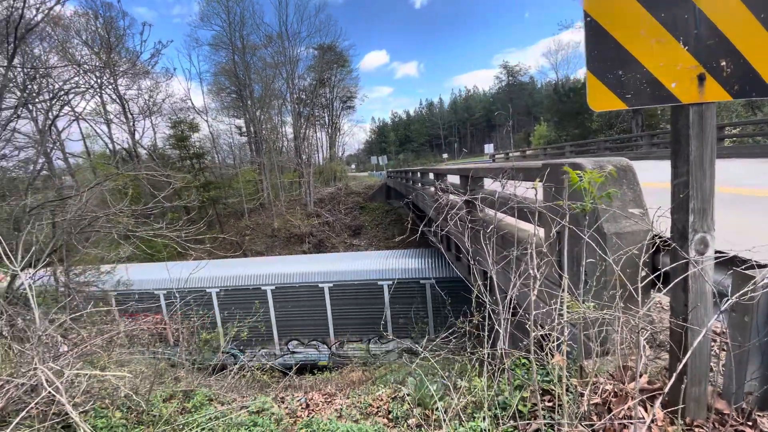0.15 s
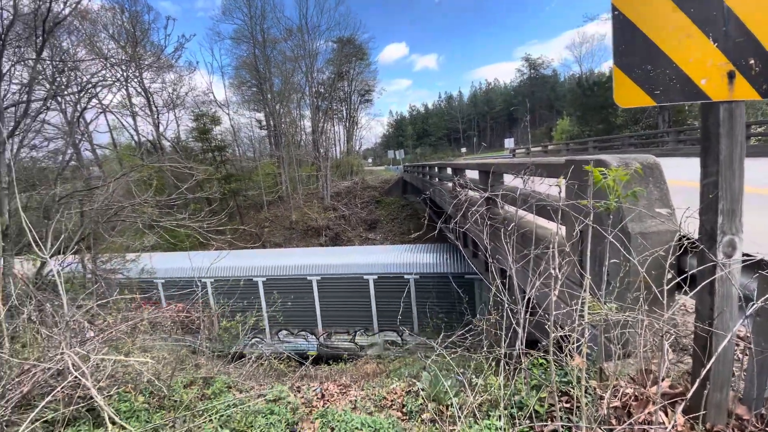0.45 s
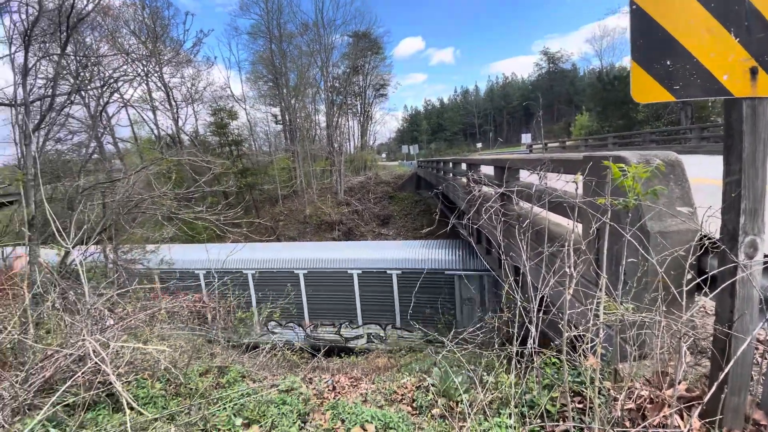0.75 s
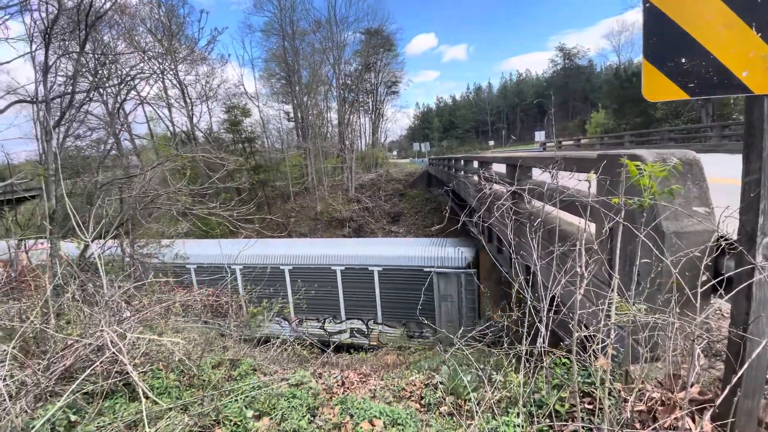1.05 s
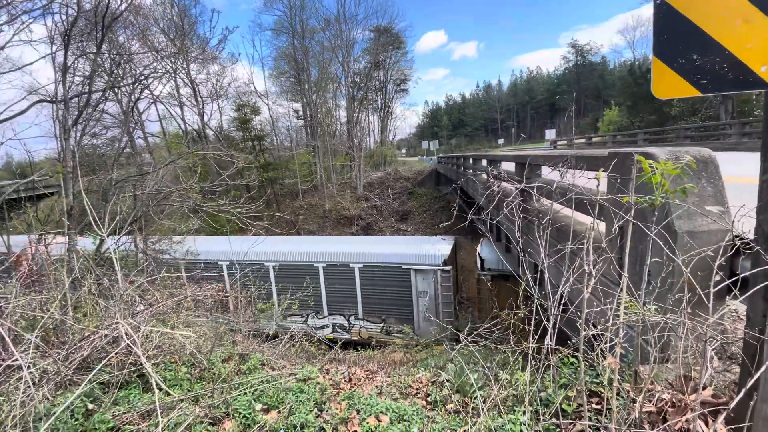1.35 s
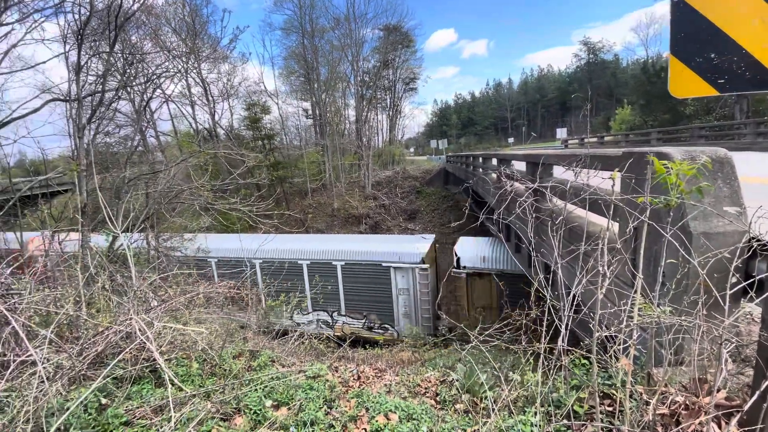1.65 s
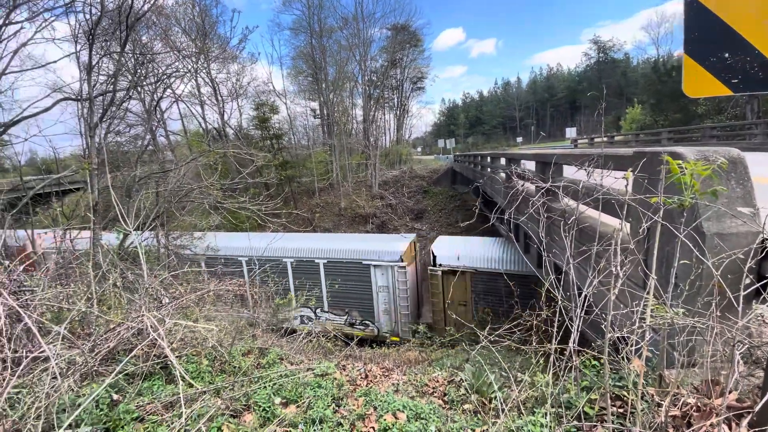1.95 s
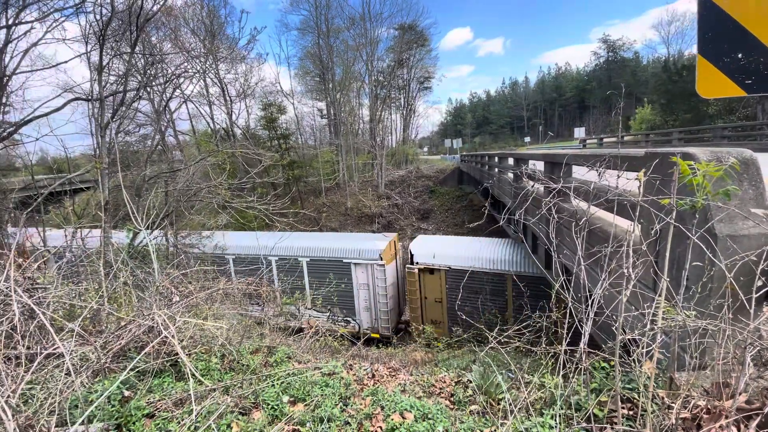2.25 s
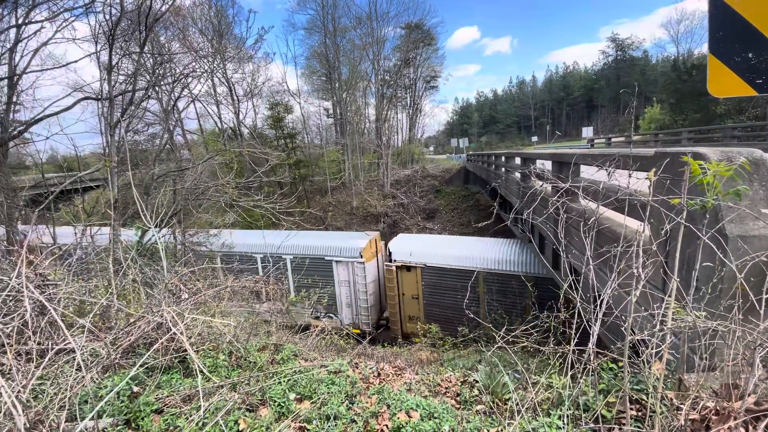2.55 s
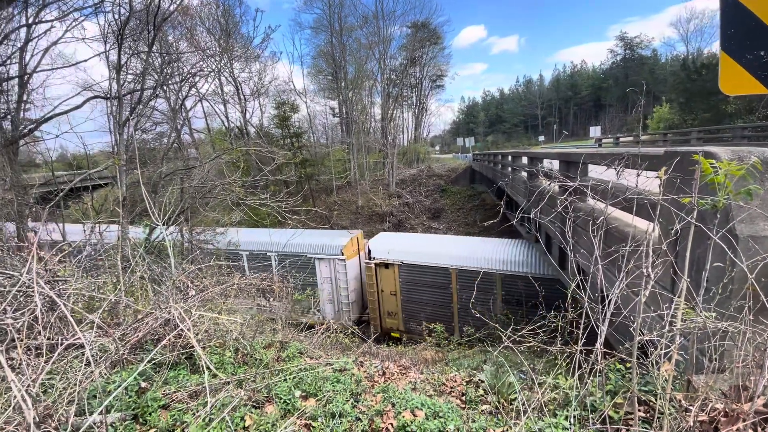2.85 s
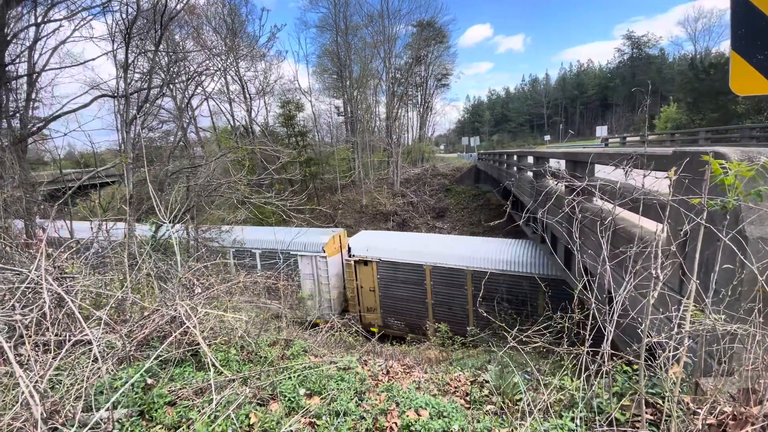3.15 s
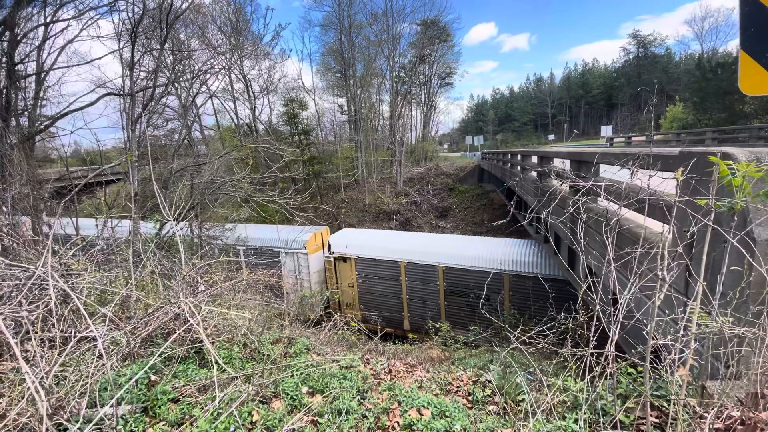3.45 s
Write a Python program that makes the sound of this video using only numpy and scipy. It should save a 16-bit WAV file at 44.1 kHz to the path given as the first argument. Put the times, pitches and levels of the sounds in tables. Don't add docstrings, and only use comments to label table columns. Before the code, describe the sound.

Long freight cars rumble steadily past outdoors, with dull joint knocks, a first metallic scrape, a sharper ringing squeal, then a third grind with loose sheet metal rattling; handheld stereo microphone on the bank above.

```python
import sys
import numpy as np
from scipy import signal
from scipy.fft import rfft, irfft, next_fast_len
from scipy.io import wavfile
from scipy.ndimage import uniform_filter1d, map_coordinates

SR = 44100
rng = np.random.default_rng(int(sys.argv[2]) if len(sys.argv) > 2 else 0)


def store_wav(level_fs):
    pcm = np.round(np.clip(np.atleast_2d(level_fs), -1, 1) * 32767)
    wavfile.write(sys.argv[1], SR, pcm.T.astype(np.int16))


def volts(x):
    e = np.asarray(x, float) / 20
    return 10 ** e


N = 158760

# middle_s, pitch_hz, peak_db
BODY_SWELLS = [(0.029, 102.4, -27), (0.129, 82, -29.5), (.93, 76, -24), (1.32, 98, -31),
               (3.4, 105.4, -30.5), (0.269, 94, -28.5), (0.359, 76.7, -23.5), (0.381, 107.7, -26),
               (.4, 165, -32.5), (.45, 67.7, -22), (.52, 83.3, -34), (.57, 102.6, -27.5),
               (.58, 83.3, -28.5), (.66, 55, -25), (.72, 97, -22.5), (0.739, 53.7, -36),
               (.75, 147.6, -35.5), (0.808, 78, -30), (.85, 108, -26), (0.921, 205.4, -34),
               (1.01, 95.2, -19.5), (1.039, 55.6, -25.5), (1.14, 55.6, -21), (1.211, 92.6, -22),
               (1.23, 179, -31), (1.281, 57, -27), (1.411, 71.6, -42), (1.429, 87.5, -27),
               (1.561, 76.7, -22.5), (1.681, 90, -24.5), (1.729, 175, -32.5), (1.788, 52.4, -25),
               (1.821, 93.4, -20.5), (1.9, 159, -32), (1.931, 96, -21.5), (1.99, 135, -29.5),
               (2.049, 65.8, -19.5), (2.199, 75, -20), (2.23, 165, -30), (2.228, 49.3, -27),
               (2.298, 85, -26.5), (2.369, 165, -30.5), (2.38, 92.3, -24.5), (2.47, 156, -37),
               (2.568, 87.2, -23), (2.641, 73, -28), (2.76, 85, -31), (2.981, 75, -21.5), (3.122, 89, -29),
               (3.221, 71.6, -25.5), (3.289, 90.4, -25.5), (3.371, 55, -27.5), (3.45, 297.4, -40),
               (3.471, 78, -29.5), (3.55, 83.4, -30.5)]
# freq_hz, density_db
TRACK_SPECTRUM = [(20, -58), (33, -23), (44, -1.5), (105, -0.5), (135, -9), (170, -10), (250, -15.5),
                  (1000, -41.5)]
# time_s, level_db
TRACK_LOAD = [(0, -27.5), (.5, -26), (1.2, -26.5), (1.4, -26), (2, -26.5), (2.6, -25.5), (3.1, -28),
              (3.6, -27.5)]
# freq_hz, density_db
TREAD_SPECTRUM = [(350, -4), (600, -1.5), (1000, 5.5), (1600, -6.5), (4000, -3), (6000, -9), (9000, -58)]
# time_s, level_db
HISS_LEVEL = [(0, -44.5), (.66, -42), (.76, -70), (1.11, -70), (1.14, -42.5), (1.58, -44.5), (1.7, -56),
              (2.1, -56.5), (2.5, -54), (3.6, -48)]
# freq_hz, density_db
HISS_SPECTRUM = [(3000, -23), (5500, 12), (8000, 4.5), (12500, 3), (15700, -12)]
# time_s, level_db
PRESS_1 = [(0, -43.5), (.41, -44), (.47, -41), (.62, -39), (.69, -37), (.75, -44.5), (.95, -46.5),
           (1.08, -53)]
PRESS_2 = [(1.1, -56), (1.15, -35.5), (1.19, -30), (1.26, -35.5), (1.31, -31.5), (1.4, -29), (1.47, -31),
           (1.56, -34), (1.68, -42.5), (1.85, -56)]
PRESS_3 = [(1.8, -44.5), (2.43, -47.5), (2.682, -39.5), (3.052, -44), (3.202, -45.5), (3.6, -38)]
# freq_hz, width_hz, level_db, loudest_s
MODES_1 = [(2750, 74, 0.5, 0.53), (2490, 120, -8, .6), (2304, 96, -14, .53), (4820, 82, -10, .64),
           (6200, 140, 0.5, 0.76), (7340, 100, -15, 0.21), (8400, 270, -10.5, 0.63), (10400, 45, -16, .2)]
MODES_2 = [(1150, 110, -10, 1.26), (1717, 31, -6.5, 1.34), (2080, 90, -5, 1.24), (2070, 34, 2, 1.44),
           (2266, 48, -3.5, 1.35), (2516, 60, -2, 1.35), (3010, 29, 5, 1.525), (4010, 50, -2.5, 1.43),
           (4120, 27, 2.5, 1.48), (5120, 40, 0.5, 1.13), (5000, 40, 1, 1.31), (5210, 30, 1, 1.54),
           (6090, 50, -1.5, 1.47), (9280, 87, -8.5, 1.47)]
MODES_3 = [(1000, 460, -2, 2.1), (2745, 49, 0, 2.5), (3250, 53, 3, 2), (4370, 500, -7, 3.08),
           (8920, 190, -8, 2.9), (11860, 130, -5, 2.2), (12500, 180, -6.5, 3)]
# freq_hz, density_db
SCRAPE_1 = [(600, -3), (1000, -12.5), (2600, -0.5), (5000, -5), (7000, -13.5), (9000, -19), (15500, -34)]
SCRAPE_2 = [(750, -13), (1000, -1), (2200, 0), (3500, 0.5), (6000, -6), (9500, -17), (12000, -17),
            (15500, -25)]
SCRAPE_3 = [(600, -44), (1000, -15), (2600, 11), (4500, -1), (6000, -6), (12000, -16.5), (15500, 5.5)]
# start_s, peak_db, pitch_hz, length_s
HOOTS_AND_KNOCKS = [
    (.005, -37, 377, 0.066),
    (.115, -33, 381, 0.072),
    (.666, -27, 720, .005),
    (.668, -28, 1000, .004),
    (2.554, -20, 740, .006),
]
# time_s, level_db
SING_LATE = [(1.85, -62), (1.9, -50), (2.02, -48), (2.1, -58), (2.33, -59), (2.37, -50), (2.46, -50),
             (2.55, -43), (2.62, -36), (2.69, -44), (2.8, -46), (2.9, -47), (2.95, -57), (3.05, -47.5),
             (3.2, -49), (3.6, -50)]
SING_LOW = [(2.45, -58), (2.6, -53), (2.66, -49), (2.78, -46), (2.85, -49), (2.97, -54), (3.1, -45),
            (3.17, -52), (3.29, -44), (3.37, -50), (3.41, -43.5), (3.47, -48), (3.6, -48)]
SING_EARLY = [(.2, -52), (.35, -54), (.45, -59), (.53, -45), (.7, -52), (.92, -53), (1.05, -64)]
SING_HIGH = [(.1, -64), (.5, -49), (.7, -50.5), (1, -54), (1.12, -56), (1.16, -36), (1.21, -44)]
SING_STREAK = [(.43, -51), (.48, -39), (.58, -45), (.63, -52), (.72, -44), (.8, -58)]
SING_HZ = (4075, 2575, 4066, 5270, 3785)
# start_s, peak_db
PANEL_RATTLES = [(2.354, -27), (2.612, -24.5), (2.72, -26.5), (2.831, -29), (2.987, -27), (3.018, -29.5),
                 (3.049, -28.5), (3.07, -26.5), (3.14, -22.5), (3.159, -23.5), (3.22, -27.5),
                 (3.245, -26.5), (3.265, -20), (3.326, -26), (3.374, -25), (3.395, -23), (3.449, -28),
                 (3.551, -25)]
# freq_hz, density_db
PANEL_SPECTRUM = [(700, -38), (1500, -3.5), (1900, 2), (3500, 5), (4500, 4), (6000, -6.5), (14000, -21)]
# freq_hz, likeness_0_to_1, right_lead_rad, left_over_right_db
PORTS = [(100, .7, .65, -.5), (380, .5, .5, -4), (720, .62, -3.1, 3), (1150, .4, 0, .5),
         (2200, .6, .9, 3), (2750, .1, 1.2, 3), (3050, .6, 2.5, 5), (3800, .15, 3.8, 3),
         (4300, .4, 5.4, 1.5), (5900, .78, 3.14, 1.5), (7450, .85, .1, -1), (8200, .2, -2.6, -4.5),
              (9300, .15, -2.4, -13), (11150, .995, 0, 0), (12400, .995, 0, 0), (13050, .45, 1.8, 0),
              (13800, .995, 3.14, 0)]
# start_db, end_db
BOOM_PAN_DB = (2.5, -1.5)


def unit(x):
    return x / np.sqrt(np.mean(x ** 2) + 1e-20)


def along(points, hz):
    f, v = np.transpose(points)
    return np.interp(np.log(hz + 1), np.log(f + 1), v)


def curve(rows, fade_s=None):
    s, db = np.transpose(rows)
    if fade_s:
        s = np.r_[s[0] - fade_s, s, s[-1] + fade_s]
        db = np.r_[-80, db, -80]
    return np.interp(np.arange(N) / SR, s, db)


def wobble(rate_hz):
    return map_coordinates(rng.standard_normal(N // 200), [np.arange(N) * rate_hz / SR])


def filtered(x, response):
    m = next_fast_len(N + SR // 2)
    return irfft(rfft(x, m) * response(np.fft.rfftfreq(m, 1 / SR)), m)[..., :N]


def rush(spectrum, patchy_db, size_bins=6):
    z = signal.stft(rng.standard_normal((2, N)), nperseg=512)[2]
    field = uniform_filter1d(rng.standard_normal(z.shape[1:]), size=size_bins, axis=0)
    field = uniform_filter1d(field, size=12, axis=1)
    pair = signal.istft(z * volts(patchy_db * unit(field)), nperseg=512)[1][:, :N]
    return unit(filtered(pair, lambda hz: volts(along(spectrum, hz))))


def ring(hz, width_hz):
    def resonance(f):
        damping = 1j * f * width_hz
        return damping / (hz * hz - f * f + damping)
    return filtered(rng.standard_normal((2, N)), resonance)


def tone(hz, wander_hz, flutter_db, rate_hz):
    pitch_hz = np.array([hz + wander_hz * wobble(rate_hz), hz + wander_hz * wobble(rate_hz)])
    flutter = volts(flutter_db * np.array([wobble(rate_hz), wobble(rate_hz)]))
    return unit(flutter * np.sin(2 * np.pi * np.cumsum(pitch_hz, axis=1) / SR))


def boom():
    half_width_s, gain_db, spread = 0.035, 2, 0.12
    s, hz, db = np.transpose(BODY_SWELLS)[..., None]
    t = np.arange(N) / SR - s
    size = volts(db + gain_db) * np.exp(-.5 * (t / half_width_s) ** 2)
    phase = 2 * np.pi * (hz * t + rng.random((len(s), 1)))
    shared = (size * np.sin(phase)).sum(axis=0)
    differing = spread * (size * np.cos(phase)).sum(axis=0)
    track = volts(curve(TRACK_LOAD)) * rush(TRACK_SPECTRUM, patchy_db=1)
    return np.array([shared, differing]) + track


def treads():
    roar_db, hiss_gain_db = -43.5, 3
    roar = volts(roar_db) * rush(TREAD_SPECTRUM, patchy_db=1.2)
    hiss_db = curve(HISS_LEVEL) + hiss_gain_db + 0.23 * wobble(7.8)
    return roar + volts(hiss_db) * rush(HISS_SPECTRUM, patchy_db=5.0, size_bins=2)


def flange(press, modes, scrape, ring_db, scrape_db, hold_s):
    flutter_db, peak_db, unevenness_db = 1.5, 5.5, .4
    t = np.arange(N) / SR
    rings = np.zeros((2, N))
    for hz, width_hz, db, loudest_s in modes:
        peak = peak_db * np.exp(-.5 * ((t - loudest_s) / hold_s) ** 2)
        rings += volts(db + flutter_db * wobble(14) + peak) * ring(hz, width_hz)
    during = (t > press[0][0]) & (t < press[-1][0])
    rings = volts(ring_db) * rings / rings[:, during].std()
    rub = volts(scrape_db) * rush(scrape, patchy_db=3.0, size_bins=2)
    return volts(curve(press, fade_s=0.031) + unevenness_db * wobble(18)) * (rings + rub)


def hoots_and_knocks():
    s, db, hz, length_s = np.transpose(HOOTS_AND_KNOCKS)[..., None]
    t = np.arange(N) / SR - s
    envelope = volts(db) * np.sin(np.pi * np.clip(t / length_s, 0, 1))
    hit = (envelope * np.sin(2 * np.pi * hz * t)).sum(axis=0)
    return np.array([hit, 0 * hit])


def sing():
    gain_db, spread = 3, .5
    levels = SING_LATE, SING_LOW, SING_EARLY, SING_HIGH, SING_STREAK
    tones = np.zeros((2, N))
    for rows, hz in zip(levels, SING_HZ):
        level = volts(curve(rows, fade_s=0.11) + gain_db)
        tones += level * tone(hz, wander_hz=22, flutter_db=2.8, rate_hz=95)
    return np.array([[1], [spread]]) * tones


def rattles():
    gain_db, rise_s, t60_s, grit_db = -4.5, .0045, .12, 2.2
    s, db = np.transpose(PANEL_RATTLES)
    t = np.clip(np.arange(N) / SR - s[:, None] + rise_s, 0, None)
    puffs = volts(db[:, None] + gain_db - 60 * t / t60_s) * (1 - np.exp(-t / rise_s))
    grit = unit(volts(grit_db * wobble(170)) * rush(PANEL_SPECTRUM, patchy_db=2))
    return np.sqrt((puffs ** 2).sum(axis=0)) * grit


def ports(pair):
    f, alike, phase_rad, db = np.transpose(PORTS)
    side = np.array([[1], [-1]])

    def shares(hz):
        angle = np.arccos(np.interp(hz, f, np.clip(alike, 0, 1))) / 2
        return np.array([np.cos(angle), np.sin(angle)])

    def balance(hz):
        gain = volts(side * np.interp(hz, f, db) / 2)
        return gain * np.exp(-.5j * side * np.interp(hz, f, phase_rad))

    same, other = filtered(pair, shares)
    return filtered(same + side * other, balance)


def scene():
    wheels = flange(PRESS_1, MODES_1, SCRAPE_1, ring_db=-3.5, scrape_db=2, hold_s=.07)
    wheels = wheels + flange(PRESS_2, MODES_2, SCRAPE_2, ring_db=-1.0, scrape_db=-0.84, hold_s=.04)
    wheels = wheels + flange(PRESS_3, MODES_3, SCRAPE_3, ring_db=-1, scrape_db=0.5, hold_s=.25)
    drift = volts(np.linspace(*BOOM_PAN_DB, N) * np.array([[.5], [-.5]]))
    return drift * ports(boom()) + ports(treads() + wheels + hoots_and_knocks() + sing() + rattles())


def low_pass(x):
    return signal.sosfilt(signal.butter(12, 15020, fs=SR, output="sos"), x)


def record(dry):
    mix = filtered(dry, lambda hz: hz < 15750)
    return low_pass(mix)


dry = scene()
out = record(dry)
store_wav(out)
```